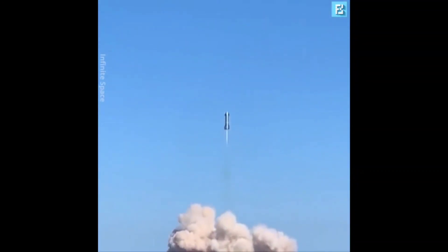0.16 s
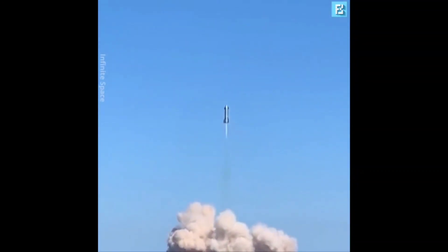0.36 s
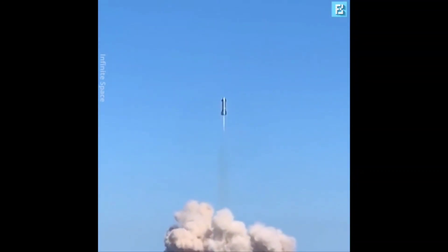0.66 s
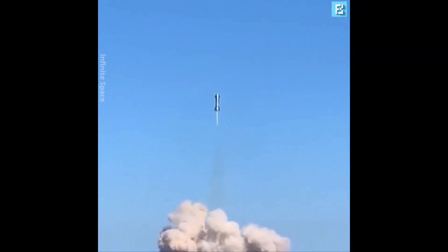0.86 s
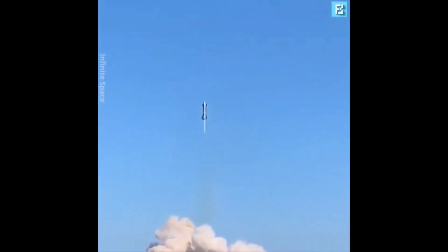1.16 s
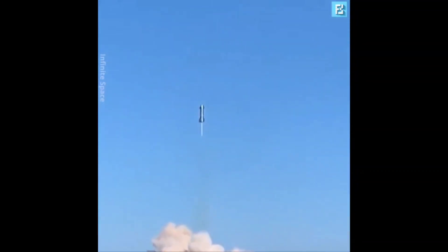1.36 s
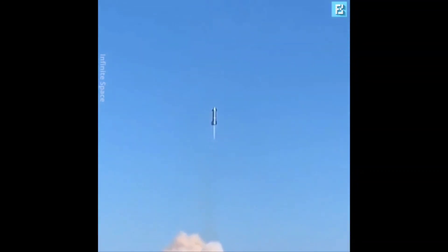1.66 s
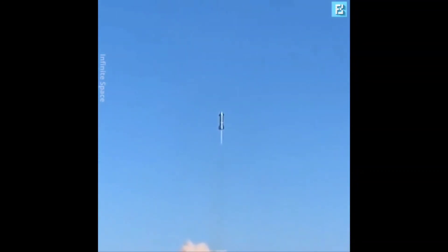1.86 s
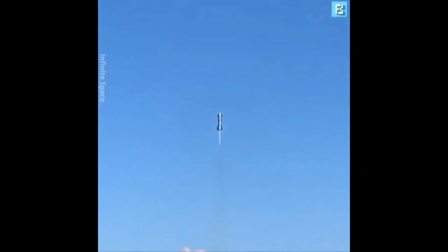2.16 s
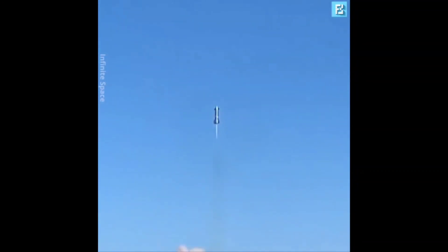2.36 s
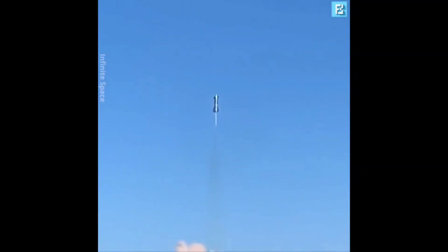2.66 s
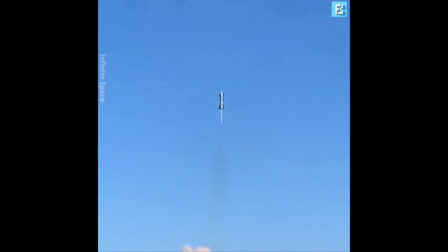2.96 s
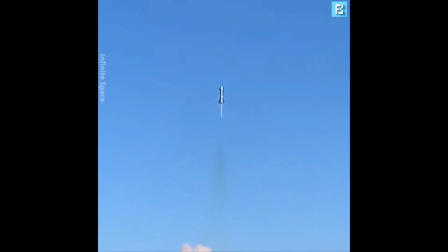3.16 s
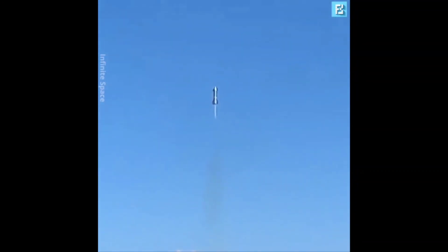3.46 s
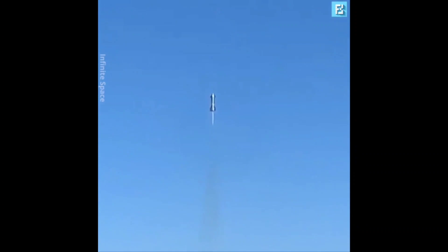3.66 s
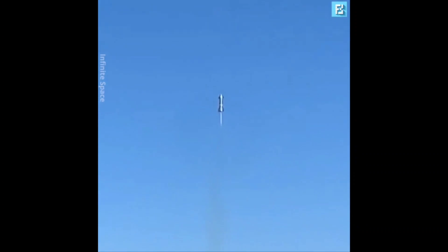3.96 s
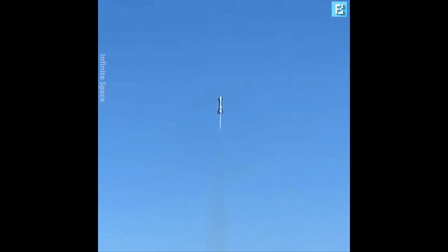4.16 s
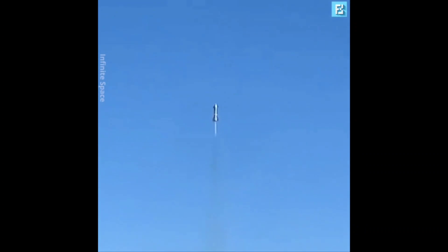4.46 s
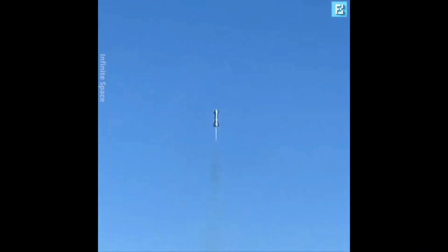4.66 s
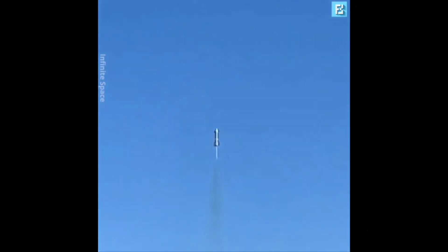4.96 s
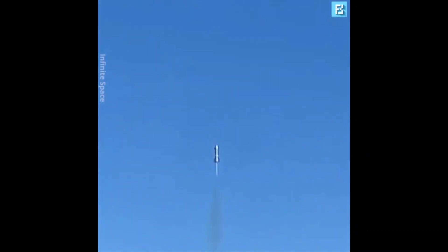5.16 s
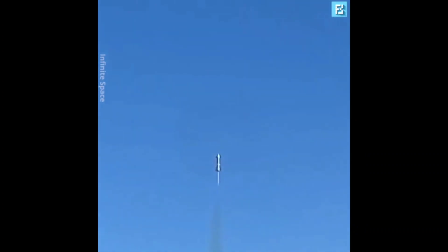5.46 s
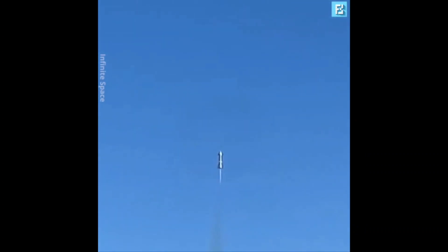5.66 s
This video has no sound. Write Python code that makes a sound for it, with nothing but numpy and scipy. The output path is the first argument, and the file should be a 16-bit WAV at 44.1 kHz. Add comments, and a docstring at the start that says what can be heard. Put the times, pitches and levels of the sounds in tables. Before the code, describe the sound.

A large rocket climbs away outdoors with deep rumbling bass, a steady dull roar, and increasingly sharp, dense crackling pops.

```python
"""In the open, far from the pad: a large rocket climbs away, heard on a phone in stereo. Plume: slow eddies
rumble (shaped noise and a narrow core); a dense train of shocks merges into a roar. On the climb the rumble
grows, the roar recedes and shock fronts steepen into crackle. The strongest shocks are single pops: a crack
with noisy scatter, a thump behind, a ragged rasp trailing."""
import sys
import numpy as np
from scipy import signal
from scipy.fft import rfft, irfft, next_fast_len
from scipy.io import wavfile
from scipy.ndimage import uniform_filter1d, minimum_filter1d

SR = 44100
rng = np.random.default_rng(int(sys.argv[2]) if len(sys.argv) > 2 else 0)


def generate_wav(sig):
    """Save sig (samples, or channels by samples) to the path in sys.argv[1] as 16-bit PCM at SR."""
    pcm = np.round(np.clip(np.atleast_2d(sig).T, -1, 1) * 32767).astype(np.int16)
    wavfile.write(sys.argv[1], SR, pcm)


N = 255513  # samples

# Spectrum of the broad rumble. Each row: frequency in Hz, relative density in dB per Hz.
RUMBLE_SPECTRUM = [(15, -41.5), (31, -19.5), (48, -5.5), (65, -3), (88, -7.5), (110, -4.5), (140, -10),
                   (200, -14.5), (500, -69.5), (1500, -100)]
# Narrow core of the rumble. Each row: time in s, level in dB before the drone trim, centre in Hz.
DRONE_TRACK = [(0, -18.5, 74.01), (0.799, -18.5, 69.94), (1.199, -19.5, 85.07), (1.6, -19.5, 92.04),
               (2.098, -28, 77.54), (2.499, -18.5, 71.89), (2.801, -15.5, 71.9), (3.05, -16.5, 82.2),
               (3.3, -17, 71.07), (3.65, -17.5, 73.02), (4.0, -17.5, 82.58), (4.5, -16, 90.9),
               (4.85, -18.5, 88.85), (5.08, -17.5, 72), (5.24, -14.5, 91.4), (5.4, -17.5, 84.9),
               (5.58, -21, 79.8), (5.76, -13.5, 86.4)]
# Spectrum of the roar. Each row: frequency in Hz, relative density in dB per Hz.
ROAR_SPECTRUM = [(40, -25), (110, -10.5), (180, -1.5), (240, 0), (320, 2.5), (420, -4), (520, -6),
                 (620, -3.5), (740, -2), (820, -2.5), (910, -11.5), (1120, -12), (1500, -19), (1800, -23.5),
                 (1980, -27.5), (2130, -43.5), (2400, -36), (2800, -49.5), (3300, -51), (4300, -66),
                 (6000, -70.5), (8000, -84.5), (9200, -90)]
# Steepening of the shock fronts. Each row: time in s, crackle level in dB before the crackle trim.
CRACKLE_TRACK = [(0.02, -67), (0.79, -69), (1.3, -59.5), (2.24, -52.5), (3.0, -51), (3.62, -46.5),
                 (3.93, -50.5), (4.35, -48.5), (5.18, -49.5), (5.77, -50)]
# Spectrum of shock fronts, cracks and rasp. Each row: frequency in Hz, relative density in dB per Hz.
CRACK_SPECTRUM = [(100, -27), (500, -1.5), (800, -4), (920, -4), (1100, -6.5), (1550, 7), (1780, -1.5),
                  (1980, 4), (2140, -10.5), (2400, 3), (2700, -1), (3200, -2), (3700, -6), (4200, -7),
                  (4450, -10), (4700, -8.5), (5200, -13.5), (5550, -6), (5850, -15.5), (6500, -11.5),
                  (7700, -18.5), (8500, -17), (11000, -16.5), (14500, -23), (17000, -42)]
# Shocks heard singly. Each row: time in s, crack in dB and thump in dB before their trims,
# edge in Hz above which the crack is dull.
POP_EVENTS = [(0.7935, -51.5, -10.5, 2570), (1.1229, -37, -21, 2570), (1.1733, -40, -12, 2520),
              (1.1994, -32.5, -2.5, 2590), (1.4097, -46, -7.5, 2570), (1.4212, -41, -11.5, 2790),
              (1.5064, -37.5, -7.5, 2550), (1.5275, -36, -8.5, 2670), (1.5924, -33, -15.5, 2320),
              (1.6781, -38.5, -6, 2660), (1.6963, -42.5, -15, 2640), (1.7755, -35.5, -6, 3310),
              (1.8826, -31.5, -8.5, 3000), (1.92, -41, -13, 3000), (2.005, -26, -10.5, 3500),
              (2.0112, -32, -14.5, 3000), (2.0364, -26, -7.5, 2700), (2.0943, -25, -8.5, 2660),
              (2.1475, -17.5, -7.5, 4070), (2.2179, -30, -8.5, 3560), (2.3568, -26, -9, 5420),
              (2.4113, -26, -10, 4700), (2.4378, -24, -17, 4070), (2.4459, -28.5, -11, 4520),
              (2.5327, -35, -18, 3960), (2.5511, -14, -7.5, 3400), (2.6006, -32, -14, 3370),
              (2.6088, -23.5, -11, 2820), (2.6215, -19.5, -9.5, 4300), (2.6485, -32, -19, 4060),
              (2.683, -33, -15, 3800), (2.7037, -31.5, -16.5, 3540), (2.733, -25.5, -8, 3980),
              (2.747, -20.5, -9.5, 4680), (2.7632, -24.5, -12.5, 4100), (2.8281, -17, -8.5, 5500),
              (2.865, -29.5, -8.5, 5130), (2.891, -23.5, -13, 4900), (2.9282, -35, -7.5, 4000),
              (2.952, -31, -13.5, 3900), (2.971, -18.5, -9, 3570), (2.9814, -22, -13, 4630),
              (2.992, -25.5, -13, 5400), (3.028, -33.5, -15, 4300), (3.047, -33, -13.5, 4500),
              (3.109, -31, -11.5, 3060), (3.124, -28, -7.5, 4320), (3.154, -28, -32, 6000),
              (3.2034, -21.5, -11, 5020), (3.2311, -26.5, -5, 3510), (3.2582, -25.5, -8.5, 5950),
              (3.313, -19, -8.5, 5480), (3.3316, -22.5, -14, 4080), (3.3582, -25.5, -7, 5500),
              (3.4206, -30, -9.5, 4030), (3.4298, -22.5, -23.5, 4140), (3.4439, -23, -8, 4500),
              (3.4649, -15, -3.5, 4700), (3.484, -24, -6, 5800), (3.5231, -23, -6, 4130),
              (3.532, -24, -9.5, 4620), (3.559, -26.5, -27, 3200), (3.576, -9.5, -1.5, 10240),
              (3.5945, -21, -14, 6750), (3.6016, -24, -12, 7400), (3.6275, -18.5, -6.5, 6260),
              (3.6371, -23.5, -11, 5240), (3.6586, -21, -14.5, 7600), (3.7024, -26.5, -13, 3780),
              (3.7773, -33, -25, 2980), (3.82, -28, -8, 3110), (3.8662, -24.5, -10.5, 3800),
              (3.9305, -29, -5.5, 4530), (3.9604, -27.5, -11.5, 4670), (4.0367, -24, -16, 4060),
              (4.0609, -22.5, -9, 4460), (4.097, -27.5, -14, 4640), (4.1159, -14.5, -9.5, 9360),
              (4.1562, -21, -6, 5040), (4.1673, -19, -14.5, 4400), (4.2244, -25, -7, 5270),
              (4.292, -21, -8, 3950), (4.3, -24.5, -12.5, 4500), (4.3341, -22.5, -11, 3480),
              (4.3485, -20, -13.5, 4640), (4.3553, -15, -4, 7500), (4.3672, -22.5, -17, 5500),
              (4.4152, -23.5, -14, 4480), (4.4388, -18, -10.5, 5200), (4.454, -15, -12, 9200),
              (4.5435, -21.5, -10.5, 4070), (4.5507, -25, -19.5, 4450), (4.578, -24.5, -16.5, 4300),
              (4.5921, -15.5, -11.5, 8600), (4.648, -16, -7, 6640), (4.7026, -17, -10.5, 5600),
              (4.7882, -19.5, -12, 4300), (4.838, -25, -19, 4300), (4.853, -21, -10.5, 5600),
              (4.882, -26, -13.5, 4730), (4.9445, -20, -10, 5230), (4.9658, -21, -10.5, 6160),
              (5.0111, -23.5, -14, 4780), (5.0258, -16.5, -6, 6400), (5.0579, -25.5, -14, 4230),
              (5.1215, -33, -11, 4100), (5.135, -26, -16.5, 4630), (5.1488, -17.0, -7.5, 6260),
              (5.1903, -15, -8.5, 6800), (5.212, -23, -19, 5700), (5.235, -26.5, -12, 4200),
              (5.2731, -22.5, -13.5, 4500), (5.3189, -12.5, -1, 5800), (5.368, -22, -10, 4610),
              (5.391, -29, -15.5, 3800), (5.406, -16.5, -12.5, 6760), (5.4716, -15, -8.5, 7700),
              (5.5102, -12, -2.5, 11400), (5.6666, -32, -12.5, 3920), (5.6908, -16, -8.5, 5200),
              (5.7243, -16.5, -3.5, 8100), (5.7493, -18, -8, 8150)]
# What rings after a shock, the lows last. Each row: frequency in Hz before the pitch spread,
# time to swell in s, relative level in dB.
THUMP_MODES = [(91, .0133, -10), (272, 0.00378, -3), (731, 0.001346, 3), (1050, 0.000826, 0.5),
               (1450, 0.00051, -7)]
# Differences between the two channels. Each row: frequency in Hz, left minus right in dB, left lead in radians.
CHANNEL_DIFFERENCES = [(60, 1, 0), (250, 1.6, -.1), (380, .5, 0), (490, 2, .8), (570, 8, 0), (630, 5, -.5),
                       (800, 0, -.2), (950, 0, 0), (1100, 2, -.1), (1380, 0, -.7), (1600, 0, 0), (2100, 0, 0),
                       (2200, 0, 3), (2450, 0, 2.8), (3200, 0, 2.1), (4100, 0, 2.6), (4800, 0, 3),
                       (5600, 0, 2), (6200, 0, .3), (9000, 0, .6), (10000, 0, 2.3), (13000, 0, 2.3),
                       (14500, 0, .8)]

# the largest eddies gain weight as the plume turns towards the listener
RUMBLE_DB, RUMBLE_GAIN_DB, TURN_FROM_TO_S = -17.5, 2.4, (1.8, 2.9)
# the deepest bass swells once against the upper rumble, before levelling
DEEP_AT_S, DEEP_WIDTH_S, DEEP_SWELL_DB, DEEP_BELOW_HZ = 3.2, 0.27, 12.5, 48.6
SHOCKS_PER_S = 1200  # weak shocks that merge into the roar
ROAR_START_DB, ROAR_DB_PER_S = -12.5, -1.3058
CRACKLE_TAIL_DB, CRACKLE_TAIL_T60_S = -1, .045
# single crack: build-up before the front, spread of the folds, 60 dB die-away before its random spread
LEAD_S, FOLD_SPREAD_S, TAIL_S = .012, .0009, .02
FOLDS_APART = 0.3  # spread of the fold part that differs between channels, relative to the common part
TOP_HZ = 15800


def undb(db):
    """Decibels to amplitude gain."""
    return 10 ** (np.asarray(db) / 20)


def across(rows, hz, axis=1):
    """One column of a frequency table, interpolated on a log axis."""
    rows = np.array(rows)
    return np.interp(np.log(hz + 1), np.log(rows[:, 0]), rows[:, axis])


def response(spectrum, size=8192):
    """Minimum-phase impulse response of a spectrum via the folded cepstrum, peak 1."""
    gains = undb(across(spectrum, np.fft.rfftfreq(size, 1 / SR)))
    cepstrum = irfft(np.log(gains))
    cepstrum[1:size // 2] *= 2
    cepstrum[size // 2 + 1:] = 0
    impulse = irfft(np.exp(rfft(cepstrum)))
    return impulse / np.abs(impulse).max()


def through(x, impulse):
    """Causal convolution, cut to the scene length."""
    return signal.fftconvolve(x, impulse)[:N]


def filtered(x, order, edge_hz, kind="lowpass"):
    """Causal Butterworth filter."""
    return signal.sosfilt(signal.butter(order, edge_hz, kind, fs=SR, output="sos"), x)


def lowpass_both_ways(x, edge_hz):
    """Zero-phase low-pass."""
    return signal.sosfiltfilt(signal.butter(2, edge_hz, fs=SR, output="sos"), x)


def split(x, edge_hz):
    """Parts of a sound below and above an edge; they sum to the input."""
    low = lowpass_both_ways(x, edge_hz)
    return low, x - low


def steady(x, span_s):
    """Hold the running rms near 1."""
    power = uniform_filter1d(x ** 2, int(span_s * SR) + 1)
    return x / np.sqrt(np.abs(power) + 1e-18)


def walk(turns_per_s):
    """Random line through unit-spread points, turning at a given rate."""
    points = rng.standard_normal(N // 20)
    return np.interp(turns_per_s * np.arange(N) / SR, np.arange(len(points)), points)


def impulses(times, sizes):
    """One spike per shock."""
    return np.bincount(np.clip(times * SR, 0, N).astype(int), sizes, N + 1)[:N]


def add(out, time_s, sound):
    """Mix a short sound in at its time."""
    start = int(time_s * SR)
    out[:, start:start + sound.shape[-1]] += sound


def rumble(deep_db, surge_db, surges_per_s):
    """Largest plume eddies: a broad hump of bass noise with random surges in level."""
    t = np.arange(N) / SR
    noise = through(rng.standard_normal(N), response(RUMBLE_SPECTRUM))
    deep, upper = split(noise, DEEP_BELOW_HZ)
    swell_db = DEEP_SWELL_DB * np.exp(-((t - DEEP_AT_S) / DEEP_WIDTH_S) ** 2)
    eddies = upper + deep * undb(deep_db + swell_db)
    turned = np.interp(t, TURN_FROM_TO_S, (0, 1))
    level_db = RUMBLE_DB + RUMBLE_GAIN_DB * turned + surge_db * walk(surges_per_s)
    return steady(eddies, span_s=0.064) * undb(level_db)


def drone(width_hz, drone_db):
    """Narrow core of the rumble: eddies shed at nearly one rate, which wanders as the plume swings."""
    t = np.arange(N) / SR
    times, levels_db, centres_hz = np.transpose(DRONE_TRACK)
    # one second of filter run-in is dropped
    slow = filtered(rng.standard_normal((2, N + SR)), 2, width_hz / 2)[:, SR:]
    phase = 2 * np.pi * np.cumsum(np.interp(t, times, centres_hz)) / SR
    core = slow[0] * np.cos(phase) + slow[1] * np.sin(phase)
    return steady(core, span_s=0.12) * undb(np.interp(t, times, levels_db) + drone_db)


def shock_train(strongest):
    """Countless shocks at random times, exponential in size up to a cap."""
    chance = rng.random((int(SHOCKS_PER_S * N / SR), 2))
    times = chance[:, 0] * N / SR
    sizes = np.minimum(-np.log(1 - chance[:, 1]), strongest)
    return times, sizes


def roar(times, sizes, mixing_db):
    """Dense shocks merge with turbulent mixing noise; the layer recedes as the rocket climbs."""
    shocks = impulses(times, sizes ** 1.71)
    flow = (shocks - shocks.mean()) / shocks.std() + undb(mixing_db) * rng.standard_normal(N)
    # a little comes back from the land around, unrelated in the two channels
    flow = flow + undb(-11.0) * rng.standard_normal((2, N))
    coloured = np.array([through(port, response(ROAR_SPECTRUM)) for port in flow])
    opened = brighten(coloured, edge_hz=1000, dull_db=-9.5, clear_s=1.75)
    return steady(opened, span_s=0.089) * climb(ROAR_START_DB, ROAR_DB_PER_S)


def brighten(x, edge_hz, dull_db, clear_s):
    """Low over the ground the roar is dull; its top opens in the first moments of the climb."""
    body, top = split(x, edge_hz)
    dullness = np.maximum(1 - np.arange(N) / SR / clear_s, 0)
    return body + top * undb(dull_db * dullness)


def climb(start_db, db_per_s):
    """Gain of a layer that fades steadily as the rocket rises."""
    return undb(start_db + db_per_s * np.arange(N) / SR)


def crackle(times, sizes, crackle_db, steepening, bursts_db):
    """Steep fronts of the same train, in bursts as single eddies pass down the plume."""
    eddies = rng.standard_normal(size=200)
    bursts = bursts_db * np.interp(times, np.linspace(0, N / SR, len(eddies)), eddies)
    level_db = np.interp(times, *np.transpose(CRACKLE_TRACK)) + bursts + crackle_db
    return fronts(times, sizes ** steepening * undb(level_db), sharp_db=-1, soft_hz=2870)


def fronts(times, sizes, sharp_db, soft_hz):
    """Shock fronts with tails: strong ones stay sharp, air rounds off the weak ones."""
    sharp = np.clip(sizes / undb(sharp_db), 0, 1)
    layers = []
    for share in (sharp, 1 - sharp):
        spikes = wrinkled(times, sizes * share, FOLD_SPREAD_S, count=6)
        layers.append(spikes + scatter(spikes, CRACKLE_TAIL_T60_S, CRACKLE_TAIL_DB, apart_db=-9.5))
    hard, soft = layers
    rounded = lowpass_both_ways(soft, soft_hz)
    colour = response(CRACK_SPECTRUM)
    return np.array([through(port, colour) for port in hard + rounded])


def wrinkled(times, sizes, spread_s, count):
    """Turbulence folds each front: signed copies of random size crowd round it and colour it."""
    chance = rng.standard_normal((len(times), 2, count))
    fold_times = times[:, None] + spread_s * chance[:, 0]
    fold_sizes = sizes[:, None] * chance[:, 1]
    return impulses(times, sizes) + impulses(fold_times.ravel(), fold_sizes.ravel())


def scatter(spikes, t60_s, wet_db, apart_db):
    """Turbulent air smears each spike into a short noisy burst, partly different in each channel."""
    decay = undb(-120 * np.arange(SR // 4) / SR / t60_s)  # of power
    power = np.abs(uniform_filter1d(through(spikes ** 2, decay / decay.sum()), size=180))
    noise = rng.standard_normal(N) + undb(apart_db) * rng.standard_normal((2, N))
    return undb(wet_db) * np.sqrt(power) * noise


def swept(depth_db, full_db, ahead_s, width_s):
    """A shock swallows weak ones it overtakes: the heavier its thump, the deeper the lull ahead of it."""
    times, _, thumps_db, _ = np.transpose(POP_EVENTS)
    t = np.arange(SR // 30) / SR
    lull = np.exp(-((t - 3 * width_s) / width_s) ** 2)
    weights = impulses(times - ahead_s - 3 * width_s, undb(thumps_db - full_db))
    return undb(depth_db * np.minimum(through(weights, lull), 1))


def rasp(rasp_db, follow, t60_s, edge_hz, rough_db, grains_per_s, patchy_db, count=14):
    """Scattered sound trails bright pops as a ragged rasp; crowded trails fuse into one surge."""
    times, cracks_db, _, edges_hz = np.transpose(POP_EVENTS)
    decay = undb(-120 * np.arange(SR // 2) / SR / t60_s)  # of power
    brightness = np.minimum(edges_hz / 6000, 1) ** 3
    power = np.abs(through(impulses(times, undb(2 * follow * cracks_db) * brightness), decay))
    noise = rng.standard_normal(N) + undb(-5) * rng.standard_normal((2, N))
    noise = np.array([through(port, response(CRACK_SPECTRUM)) for port in noise])
    limits_hz = np.geomspace(2200, min(edge_hz, TOP_HZ), count + 1)
    ragged = np.zeros((2, N))
    for band_hz in zip(limits_hz, limits_hz[1:]):
        ragged += filtered(noise, 3, band_hz, "bandpass") * undb(patchy_db * walk(45))
    ragged *= undb(rough_db * walk(grains_per_s))
    return ragged / ragged.std() * np.sqrt(power) * undb(rasp_db)


def pops(crack_db, thump_db, pitch_spread, tail_spread, scatter_db):
    """Single strong shocks: a crack, the more scattered the duller it is, then a thump falling in pitch."""
    out = np.zeros((2, N + SR))
    colour = response(CRACK_SPECTRUM)
    for time_s, sharp_db, body_db, edge_hz in POP_EVENTS:
        pitch, length = np.exp(np.array([pitch_spread, tail_spread]) * rng.standard_normal(2))
        tail_db = -scatter_db * np.log2(edge_hz / 7000)
        snap = crack(colour, edge_hz, tail_db, TAIL_S * length, fold_share=0.63)
        add(out, time_s - LEAD_S, undb(sharp_db + crack_db) * snap)
        add(out, time_s, undb(body_db + thump_db) * thump(pitch, size=3000))
    return out[:, :N]


def crack(colour, edge_hz, tail_db, tail_s, fold_share, count=6, size=3000):
    """One steep front amid folds and scatter, rounded above its edge; short-term treble rms peaks at 1."""
    lead = int(LEAD_S * SR)
    t = (np.arange(size) - lead) / SR
    front = np.zeros((2, size))
    folds = lead + FOLD_SPREAD_S * SR * rng.standard_normal(count)
    folds = np.clip(folds, 0, size - 1).astype(int)
    # folds come from slightly different directions, so the channels weigh them differently
    weights = rng.standard_normal(count) + FOLDS_APART * rng.standard_normal((2, count))
    front[:, folds] = fold_share * weights
    front[:, lead] = 1
    burst = undb(-60 * np.maximum(t / tail_s, -t / LEAD_S))
    noise = rng.standard_normal(size) + undb(-7.5) * rng.standard_normal((2, size))
    wave = front + undb(tail_db) * noise * burst / np.linalg.norm(burst)
    wave = filtered(wave, 3, min(edge_hz, TOP_HZ))
    wave = signal.fftconvolve(wave, colour[None, :size])[:, :size]
    treble = filtered(wave, 4, (2300, 4500), "bandpass")
    power = uniform_filter1d((treble ** 2).mean(axis=0), size=60, mode="constant")
    return wave / np.sqrt(power.max())


def thump(pitch, size):
    """Body behind a shock: swelling modes, the lows last; pitch differs with the size of the eddy."""
    t = np.arange(size) / SR
    body = np.zeros(size)
    for hz, swell_s, db in THUMP_MODES:
        envelope = (t / swell_s * np.exp(1 - t / swell_s)) ** 2
        body += undb(db) * envelope * np.cos(2 * np.pi * pitch * hz * (t - swell_s))
    return body


def scene():
    """Rumble, roar, crackle and pops from one far point in the sky."""
    bass = rumble(deep_db=-6.5, surge_db=0.1, surges_per_s=6.4) + drone(width_hz=11.4, drone_db=-0.36)
    times, sizes = shock_train(strongest=4.05)
    train = roar(times, sizes, mixing_db=-1.5)
    train = train + crackle(times, sizes, crackle_db=10.0, steepening=1.27, bursts_db=2.0)
    trails = rasp(rasp_db=-30, follow=0.76, t60_s=0.3, edge_hz=7800,
                  rough_db=3.0, grains_per_s=190, patchy_db=6.5)
    lulls = swept(depth_db=-7, full_db=-9.5, ahead_s=.003, width_s=.004)
    single = pops(crack_db=-3.5, thump_db=1.0, pitch_spread=0.07, tail_spread=0.85, scatter_db=5.5)
    return bass + (train + trails) * lulls + single


def stereo_differences(x):
    """Each band differs in level and phase between the left and right channels."""
    size = next_fast_len(N + SR // 4)
    hz = np.fft.rfftfreq(size, 1 / SR)
    sides = np.array([[.5], [-.5]])
    level = undb(sides * across(CHANNEL_DIFFERENCES, hz, axis=1))
    shift = np.exp(1j * sides * across(CHANNEL_DIFFERENCES, hz, axis=2))
    return irfft(rfft(x, size) * level * shift, size)[:, :N]


def limiter(x, ceiling, hold_s):
    """Gain dips smoothly around every peak above the ceiling, both channels alike."""
    span = int(hold_s * SR) + 1
    gain = np.minimum(1, ceiling / (np.abs(x).max(axis=0) + 1e-9))
    return x * uniform_filter1d(minimum_filter1d(gain, span), span)


def record(dry):
    """Bass cut, left-right differences, limiter, then a steep top cut."""
    heard = stereo_differences(filtered(dry, 3, 28, "highpass"))
    held = limiter(heard, ceiling=.93, hold_s=.006)
    return signal.sosfilt(signal.ellip(8, .2, 70, TOP_HZ, fs=SR, output="sos"), held)


dry = scene()
out = record(dry)
generate_wav(out)
```